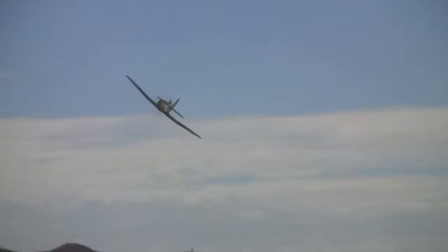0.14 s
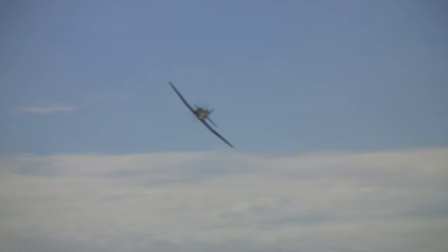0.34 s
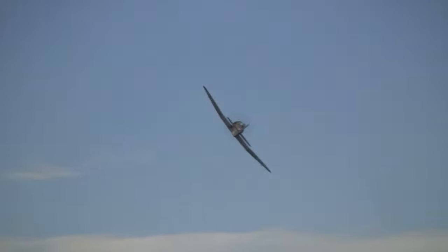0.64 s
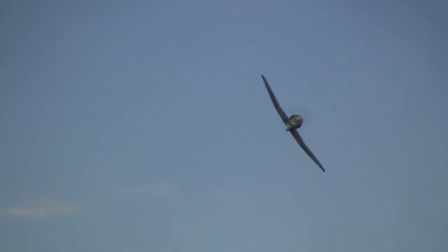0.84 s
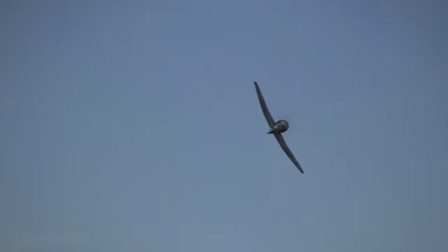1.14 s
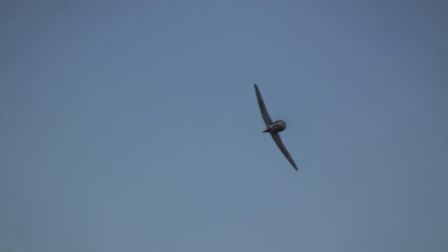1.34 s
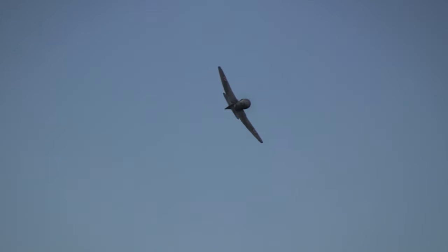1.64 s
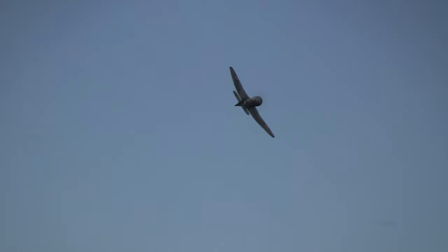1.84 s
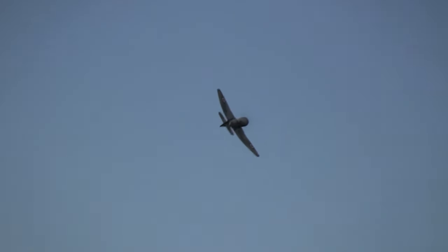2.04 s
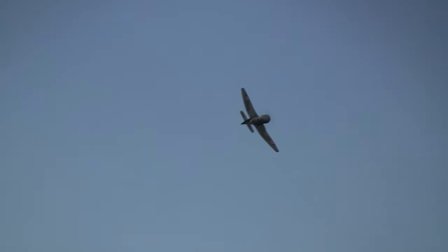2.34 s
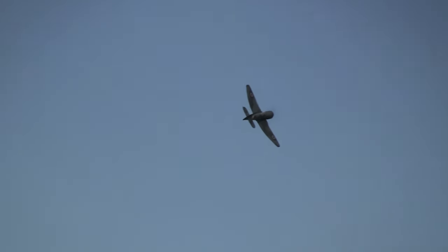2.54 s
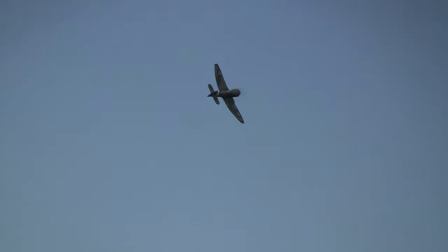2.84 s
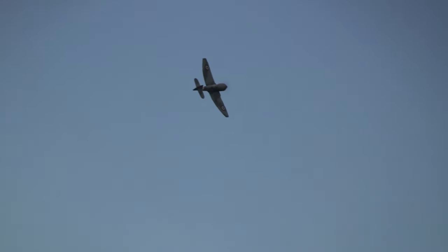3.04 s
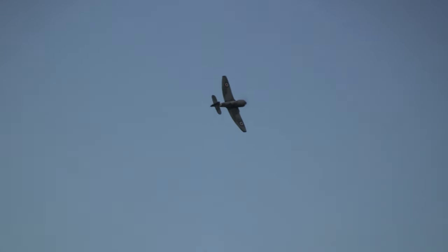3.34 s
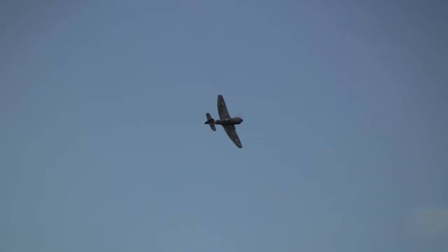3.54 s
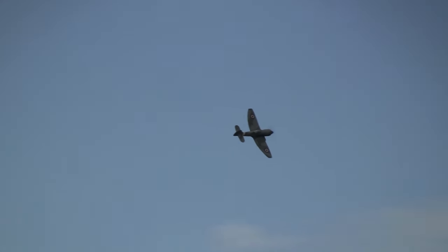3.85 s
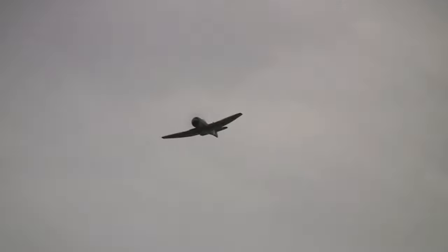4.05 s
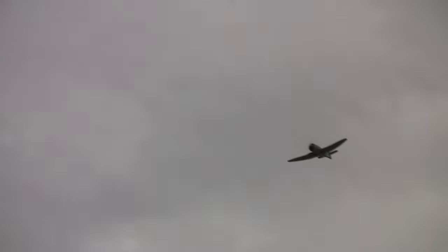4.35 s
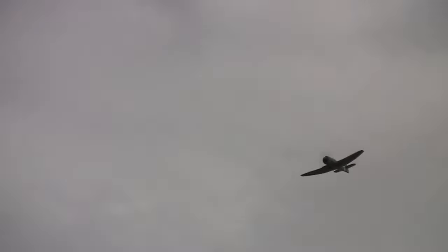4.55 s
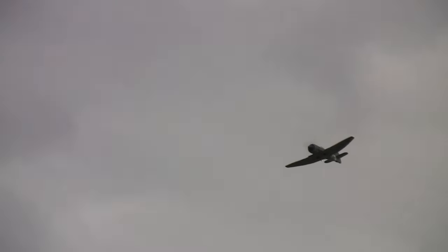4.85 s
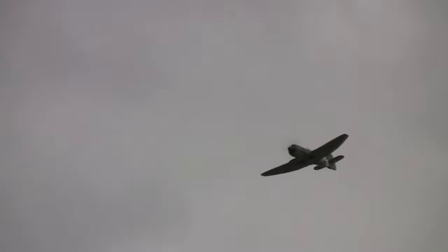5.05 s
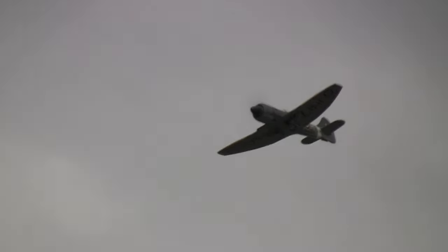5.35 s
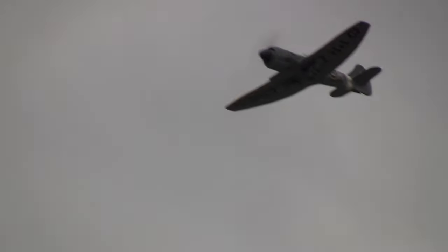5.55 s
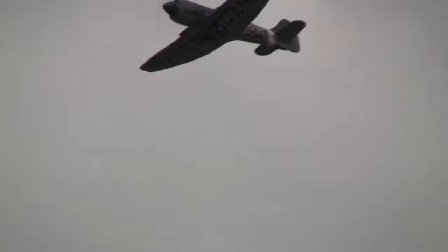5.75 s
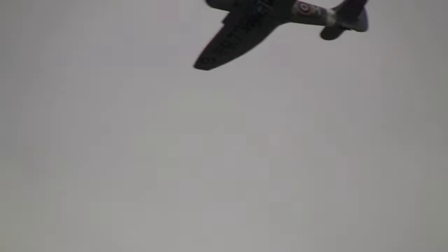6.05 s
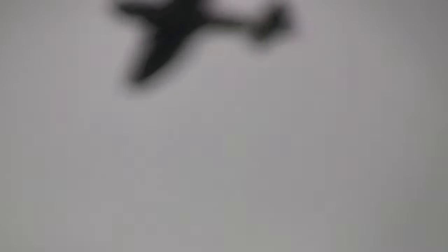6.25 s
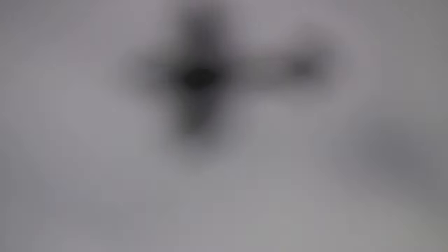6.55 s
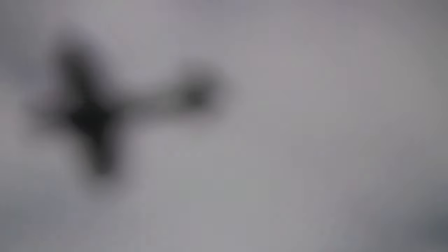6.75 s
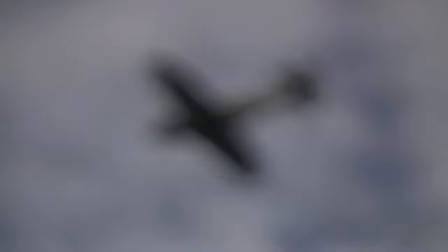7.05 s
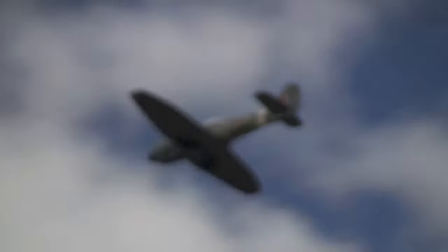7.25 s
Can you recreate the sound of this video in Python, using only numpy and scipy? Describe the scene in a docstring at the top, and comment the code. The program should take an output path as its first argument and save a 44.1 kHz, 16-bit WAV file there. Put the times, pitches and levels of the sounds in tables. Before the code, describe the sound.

A large model aircraft's engine drones outdoors, a low boom with a raspy bark above it, over a faint steady rumble. It softens during the first second, then holds its pitch, growing duller and more throbbing as the plane banks away. A small gust touches the microphone at 0.8 seconds, and a sharp close click with a dull bump comes at 1.6 seconds. At about 4 seconds everything dips briefly to silence. The engine returns, approaching and rising slightly in pitch, while low gusts buffet the microphone until about 6 seconds. It grows louder and brighter, with a hollow sweeping tone and a propeller hiss near 5.7 seconds. The plane passes overhead, loudest around 6.8 seconds, its pitch falling as the exhaust rasps and sizzles. Two faint, thin falling whistles sound near 6.7 and 7 seconds as it starts to move away.

```python
"""A model aircraft turns and flies overhead

A large model aircraft with a five-cylinder four-stroke engine banks away through a wide turn. After a
dip to silence it approaches and passes overhead, falling in pitch. Its exhaust makes a low boom and a
higher bark, and its propeller hisses. An echo off the ground sweeps a hollow colour through the sound,
and the air dulls it with distance. Gusts buffet the microphone, and something clicks close to it."""
import sys
import numpy as np
from scipy import signal
from scipy.fft import rfft, irfft, next_fast_len
from scipy.io import wavfile

SR = 44100
rng = np.random.default_rng(int(sys.argv[2]) if len(sys.argv) > 2 else 0)


def persist_wave(psi):
    """Save psi, clipped to +-1, as 16-bit WAV."""
    counts = np.round(np.clip(psi, -1, 1) * 32767).astype(np.int16)
    wavfile.write(sys.argv[1], SR, np.atleast_2d(counts).T)


N = 325899
T = np.arange(N) / SR


def undb(db):
    """Turn decibels into a factor to multiply by."""
    return 10 ** (np.asarray(db) / 20)


def curves(table):
    """Join the rows of a (time, values...) table with straight lines: one curve per value."""
    times, *columns = np.transpose(table)
    return [np.interp(T, times, column) for column in columns]


def unit(x):
    """Scale a signal to a typical size (rms) of 1."""
    return x / np.std(x)


def swell(middle_s, length_s):
    """A smooth, bell-shaped rise and fall."""
    return np.exp(-2 * ((T - middle_s) / length_s) ** 2)


def noise():
    """White noise: an even hiss."""
    return rng.standard_normal(N)


def colour(x, points):
    """Shape the lows and highs by (frequency [Hz], level [dB]) points; the result has size 1."""
    size = next_fast_len(N, real=True)
    hz = np.maximum(np.fft.rfftfreq(size, 1 / SR), 1)
    point_hz, point_db = np.transpose(points)
    gain = undb(np.interp(np.log(hz), np.log(point_hz), point_db))
    return unit(irfft(rfft(x, size) * gain, size)[:N])


def narrow_noise(hz, width_hz):
    """Noise gathered around one pitch, which may move."""
    lowpass = signal.butter(2, width_hz / 2, fs=SR, output="sos")
    slow = signal.sosfilt(lowpass, noise() + 1j * noise())
    return unit(np.real(slow * np.exp(2j * np.pi * np.cumsum(hz) / SR)))


def walk(per_s):
    """Wander smoothly to a new random value per_s times a second."""
    place = np.minimum(T * per_s, 1022)
    k = place.astype(int)
    values, step = rng.standard_normal(1024), place - k
    return values[k] + (values[k + 1] - values[k]) * step * step * (3 - 2 * step)


def background():
    """A steady, quiet rumble and hiss."""
    # colour of the rumble and hiss (frequency [Hz], level [dB])
    rumble_colour = [(25, -38), (45, -22), (62, -7), (82, 0), (110, -8), (200, -15), (500, -28),
                     (1500, -38), (4000, -46), (8000, -50), (15000, -53)]
    return undb(-47) * colour(noise(), rumble_colour)


def faint_tone(middle_s=1.34, length_s=.317, top_hz=343, sag_hz=22.4):
    """A soft, low tone whose pitch and loudness rise and fall once."""
    place = np.clip(2 * (T - middle_s) / length_s, -1, 1)
    hz = top_hz - sag_hz * place ** 2
    return undb(-41.5) * (1 - place ** 2) * np.sin(2 * np.pi * np.cumsum(hz) / SR)


def wind():
    """Each gust swells and dies as a low flutter on the microphone."""
    # gusts (time [s], length [s], level [dB])
    gusts = [(0.791, 0.06, -30), (4.167, 0.18, -26.5), (4.427, 0.12, -28), (4.624, 0.17, -40),
             (4.857, 0.19, -26.5), (5.207, 0.13, -31), (5.72, 0.29, -30.5)]
    # colour of the flutter (frequency [Hz], level [dB])
    gust_colour = [(25, -50), (60, -35), (130, -16), (190, -6), (245, 0), (290, -4), (340, -10), (420, -27),
                   (1000, -40), (4000, -54), (12000, -75)]
    strength = sum(undb(db) * swell(s, length) for s, length, db in gusts)
    return strength * colour(noise(), gust_colour)


def click(start_s=1.6285):
    """A small hard part snaps and rings for a few milliseconds."""
    # ringing tones (pitch [Hz], time to fade by 60 dB [s], starting level [dB])
    tones = [(2750, 0.0073, -24), (3350, 0.0087, -12), (4900, 0.007, -21), (5300, 0.0049, -44),
             (5950, .006, -30), (8100, .008, -23), (12000, 0.0014, -12)]
    age = np.clip(T - start_s, 0, .1)
    return sum(undb(db - 60 * age / fade_s) * np.sin(2 * np.pi * hz * age) for hz, fade_s, db in tones)


def knocks(size=16384):
    """Small ticks and dull bumps close by: fading bursts of noise, each around its own pitch."""
    # bursts (time [s], pitch [Hz], width [octaves], time to fade by 60 dB [s], level [dB])
    bursts = [(1.548, 9000, 0.25, 0.0073, -50), (1.628, 5100, 0.49, 0.0054, -9),
              (1.636, 130, 0.56, 0.11, -25), (1.645, 60, 0.44, 0.08, -29), (2.701, 2840, 0.29, 0.048, -47),
              (2.955, 7500, .4, .02, -56), (5.68, 62, 0.5, .14, -38)]
    out, age = np.zeros(N + size), np.arange(size) / SR
    freq = np.fft.rfftfreq(size, 1 / SR) + 1
    for s, hz, octaves, fade_s, db in bursts:
        band = np.exp(-(np.log2(freq / hz) / octaves) ** 2 / 2)
        burst = unit(irfft(rfft(rng.standard_normal(size)) * band))
        start = int(s * SR)
        out[start:start + size] += burst * (1 - np.exp(-hz * age)) * undb(db - 60 * age / fade_s)
    return out[:N]


def ground(x, lag_ms, reflect):
    """Add a duller echo off the ground; it strengthens some pitches and weakens those between."""
    dull = signal.sosfiltfilt(signal.butter(1, 9000, fs=SR, output="sos"), x)
    return x + reflect * np.interp(T - lag_ms / 1000, T, dull)


def air(x, loss_db):
    """Air soaks up treble: loss_db at 4 kHz, and more with frequency up to 7 kHz."""
    hz, times, spectra = signal.stft(x, SR, nperseg=512)
    cut_db = np.outer(np.minimum(hz, 7000) / 4000, np.interp(times, T, loss_db))
    return signal.istft(spectra * undb(-cut_db), SR, nperseg=512)[1][:N]


def whistles(fall_per_s=.13):
    """Two brief, thin whistles fall in pitch as the aircraft goes by."""
    # thin whistles (time [s], length [s], pitch [Hz], level [dB])
    notes = [(6.65, 0.18, 3890, -41), (7.035, 0.12, 2930, -38.5)]
    out = 0
    for s, length, hz, db in notes:
        note = narrow_noise(hz * (1 - fall_per_s * (T - s)), width_hz=32)
        out += undb(db) * swell(s, length) * note / np.sqrt(2)
    return out


def tip_hiss(rate, distance, ahead, cone_deg=46.7, spread_deg=7.6):
    """Propeller tips throw hiss forward in a cone, loudest as the cone sweeps over the listener."""
    # colour of the hiss (frequency [Hz], level [dB])
    tip_colour = [(800, -28), (1800, 6.5), (2600, 2.5), (4400, 0), (6000, -10), (8000, -30), (14000, -43)]
    off_cone = (np.degrees(np.arccos(ahead)) - cone_deg) / spread_deg
    blades = 2 * np.pi * 4 * np.cumsum(rate) / SR
    hiss = colour(noise() * (1 + .89 * np.cos(blades)), tip_colour)  # chopped once per blade
    return hiss * undb(-37 - off_cone ** 2) / distance


def sizzle(rate, distance, ahead):
    """A short spit of gas at each firing, louder in front; the air soon swallows it."""
    # colour of the spit (frequency [Hz], level [dB])
    spit_colour = [(2000, -25), (4400, -2), (5300, -3), (6200, 7.5), (7400, -10), (8300, -3), (10000, -14),
                   (11900, -9.5), (13400, -14), (14500, -24)]
    firing = 2 * np.pi * 5 * np.cumsum(rate) / SR
    spits = noise() * np.exp(.97 * np.cos(firing) + .33 * walk(60))
    return colour(spits, spit_colour) * undb(-51.5 + 5.5 * ahead) / distance ** 3


def throbbing_bands(rate):
    """Bands of noise near 2 kHz throb with the engine; a low hum near 500 Hz swells after the pass."""
    # bands (time [s], length [s], pitch [times the cycle rate], width [Hz], level [dB], throb [dB])
    bands = [(6.57, .3, 123, 330, -38.5, 4), (7.05, .5, 113, 360, -41, 5), (7.2, .42, 31, 70, -33.5, 1)]
    cycle = 2 * np.pi * (np.cumsum(rate) / SR - .86)
    throb = np.cos(cycle) + .35 * np.cos(2 * cycle) + .4 * np.cos(10 * cycle)
    out = 0
    for s, length, multiple, width_hz, db, throb_db in bands:
        band = unit(undb(throb_db * throb) * narrow_noise(multiple * rate, width_hz))
        out += undb(db) * swell(s, length) * band
    return out


def clatter(cycles, size=65536):
    """Moving parts rattle in a pattern that repeats every engine cycle and slowly changes."""
    multiples, out = np.arange(1, 400), 0
    strength = undb(-4 * (multiples % 2))  # tones in step with the shaft are stronger
    for _ in range(2):
        spectrum = strength * np.exp(2j * np.pi * rng.random(len(multiples)))
        pattern = irfft(np.r_[0, spectrum], size)
        drift = 1.458 * T + walk(.97) + 2 * np.pi * rng.random()
        out += np.cos(drift) * pattern[(cycles % 1 * size).astype(int) % size]
    return unit(out)


def engine_tones(cycles, table, side, scatter, afterbeat_cycles=.157):
    """Exhaust and propeller tones: in step they make beats, scattered they make a drone."""
    out = 0
    for multiple, *levels in table:
        smear = -np.pi * (multiple - 43) ** 2 / 180  # the pipes draw each beat out
        # the shift in timing that a second, half-strength beat gives this tone
        afterbeat = np.angle(1 + .5 * np.exp(-2j * np.pi * multiple * afterbeat_cycles))
        looseness = 1 + (max(multiple - 44, 0) / 9) ** 2  # high tones keep less in step
        phase = smear + afterbeat + np.minimum(scatter * looseness, np.pi) * rng.uniform(-.99, 1)
        gain = np.interp(side, [0, .5, 1], undb(levels))
        out += gain * np.cos(2 * np.pi * (multiple * cycles % 1) + phase)
    return np.sqrt(2) * out


def engine(rate, view, side, boom_tones, bark_tones, rasp_colour, boom_db, bark_db, burble_db,
           beats_db, clatter_db, gas_db, throb_db, lope_db, ring_on_db, flutter_db, uneven_db,
           scatter, pulsing, jitter):
    """Exhaust boom, bark and rasp. One cycle is two shaft turns and five firings, each a puff of gas.
    Rate is cycles a second. View (throb) and side (mix of tones) go from 0, nose-on, to 1, side-on."""
    # colour of the exhaust's uneven burble (frequency [Hz], level [dB])
    burble_colour = [(25, -48), (50, -42), (90, -5.5), (125, 1.5), (175, 7.5), (260, 4.5), (340, 0),
                     (450, -23.5), (800, -52)]
    cycles = np.cumsum(rate) / SR - .86 + jitter * walk(40)  # no two firings are timed alike
    shaft, firing = 2 * np.pi * 2 * cycles, 2 * np.pi * 5 * cycles
    puffs = np.exp(pulsing * (.28 * np.cos(firing) + np.cos(2 * firing)))
    boom = engine_tones(cycles, boom_tones, side, scatter=np.pi) * undb(.5 * walk(6.7))
    boom += undb(burble_db) * colour(noise(), burble_colour)
    rasp = undb(clatter_db) * colour(puffs * clatter(cycles), rasp_colour)
    rasp += undb(gas_db) * colour(puffs * noise(), rasp_colour)
    # from the side, the bark gathers into one beat per shaft turn, every other beat stronger
    throb = throb_db * (.15 + .85 * view) * (np.cos(shaft) + 1.2 * np.cos(shaft / 2 - .5))
    throb += ring_on_db * np.sin(shaft)  # the pipes ring on after the beat, then fall quiet
    beats = engine_tones(cycles, bark_tones, side, scatter) * undb(throb)
    lope = lope_db * view * np.cos(shaft / 2)  # unequal cylinders swell the rasp once per cycle
    bark = undb(beats_db) * beats + rasp * undb(throb / 2 + lope)
    bark *= undb(uneven_db * walk(45))  # no two beats are equally strong
    bark *= undb(bark_db + flutter_db * walk(14))  # swirling air makes the higher sounds flutter
    return boom * undb(boom_db) + bark


def wide_turn():
    """The aircraft banks from nose-on to side-on and grows duller as it draws away."""
    # engine speed (time [s], cycle rate [Hz])
    speed = [(0, 17.73), (.7, 17.51), (2, 17.52), (2.4, 17.41), (2.85, 17.52), (3.1, 17.45), (4, 17.51)]
    # lag of the ground echo, growing as the aircraft climbs (time [s], lag [ms])
    echo_lag = [(0, .97), (.2, 1.01), (.7, 1.15), (1.1, 1.235), (1.5, 1.295), (2.7, 1.375), (3.55, 1.49),
                (3.95, 1.457)]
    # exhaust loudness (time [s], boom [dB], bark [dB])
    loudness = [(0, -28, -29.5), (.55, -34.5, -36), (.9, -35.5, -38), (1.25, -36.5, -38), (2.1, -35, -36.5),
                (3.2, -33, -37.5), (3.9, -31.5, -37.5)]
    # low tones (pitch [times the cycle rate], nose-on [dB], half turned [dB], side-on [dB])
    boom_tones = [(5, -27, -25, -21), (8, -11, -23, -14), (9, -24.5, -25, -31), (10, 0, -.5, 0),
                  (12, -16.5, -13.5, -14.5), (14, -11.5, -4, -1), (16, -18, -20, -31.5),
                  (18, -23, -30, -23.5), (20, -9, -15, -24), (22, -24, -24, -34), (24, -20, -13, -20)]
    # higher tones (pitch [times the cycle rate], nose-on [dB], half turned [dB], side-on [dB])
    bark_tones = [(26, -18, -14, -16.5), (30, -14.5, -3.5, -7.5), (32, -8.5, -15, -10), (34, -2, -5, -9.5),
                  (36, -29, -24, -16.5), (38, -9.5, 0.5, -10), (40, -20, -2.5, -7.5), (44, -21, -14.5, -12),
                  (46, -18, -14, -9.5), (48, -17, -16.5, -6), (50, -18, -17.5, -21.5), (52, -15, -28, -19),
                  (54, -9, -19, -22), (55, -14, -30, -34), (56, -9, -15, -24), (58, -20, -28, -27),
                  (60, -14, -26, -29), (64, -16, -20, -24), (66, -24, -15, -21), (70, -37, -15, -17),
                  (72, -21, -30, -15), (74, -37, -21, -14), (76, -28, -24, -16), (80, -38, -27, -15),
                  (82, -33, -17.5, -11.5), (84, -24, -28, -15.5), (98, -30, -18.5, -31),
                  (114, -34, -21, -17)]
    # rasp of gas, valves and blades (frequency [Hz], level [dB])
    rasp_colour = [(200, -52), (350, -4), (500, 0), (700, 1.5), (1000, -5.5), (1500, -4), (2500, -9.5),
                   (4000, -13.5), (6000, -20), (9000, -28), (15000, -46)]
    # the tones fall into step, so beats emerge from a drone (time [s], scatter [radians])
    out_of_step = [(.4, 3), (1, 1), (1.6, .3)]
    # how much the pipes ring on after each beat (time [s], depth [dB])
    ring_on = [(.5, 0), (1.3, 2), (2, 3.5), (2.9, 2.8), (3.6, 1.2)]
    (rate,), (lag_ms,), (boom_db, bark_db) = curves(speed), curves(echo_lag), curves(loudness)
    (scatter,), (ring_on_db,) = curves(out_of_step), curves(ring_on)
    turning_s = np.maximum(T - .91, 0)
    view = 1 - np.exp(-turning_s)
    side = np.clip((T - .66) / 2.88, 0, 1)  # banking sweeps the exhaust's beams over the listener
    sound = engine(rate, view, side, boom_tones, bark_tones, rasp_colour, boom_db, bark_db,
                   burble_db=-9.5, beats_db=-1, clatter_db=-7.5, gas_db=-2.5,
                   throb_db=.7, lope_db=.6, ring_on_db=ring_on_db, flutter_db=.36, uneven_db=.8,
                   scatter=scatter, pulsing=.15, jitter=.00045)
    loss_db = 4.5 + 10.5 * view + 2 * turning_s + .31 * walk(3.3)
    return air(ground(sound, lag_ms, reflect=.51), loss_db)


def overhead_pass(closest_s=6.804, crossing_s=1.1715, share_of_sound_speed=.09):
    """A straight fly-by: distance and angle set the pitch, level, dullness and ground echo."""
    # engine speed on board, rising in the dive, then easing (time [s], cycle rate [Hz])
    speed = [(4.55, 15.99), (5, 16.34), (5.26, 16.83), (6.08, 16.96), (6.28, 16.6), (6.62, 16.35),
             (7.31, 16.16)]
    # low tones (pitch [times the cycle rate], nose-on [dB], half turned [dB], side-on [dB])
    boom_tones = [(5, -18.5, -18.0, -21.5), (8, -16.0, -8.0, -11.5), (9, -10.0, -13.0, -14.5),
                  (10, 1.0, 0.5, -1.5), (11, -6.5, -6.5, -8.0), (12, -18.5, -13.0, -26.5),
                  (13, -8.0, -12.0, -17.0), (14, -5.5, -2.5, -3.0), (15, -5.0, -13.0, -11.0),
                  (16, -21.5, -9.0, -2.0), (19, -14.5, -24.0, -22.0), (20, -14.5, -18.0, -14.0),
                  (22, -30.5, -17.0, -30.5), (24, -21.0, -29.5, -12.0)]
    # higher tones (pitch [times the cycle rate], nose-on [dB], half turned [dB], side-on [dB])
    bark_tones = [(25, -18.0, -20.0, -29.0), (26, -19.5, -24.0, -15.5), (30, -16.5, -22.5, -18.0),
                  (32, -18.5, -23.0, -24.5), (34, -21.5, -23.0, -14.0), (40, -19.5, -20.5, -13.0),
                  (44, -12.5, -17.0, -13.5), (46, -22.5, -25.5, -19.5), (48, -17.5, -30.0, -17.5),
                  (50, -14.5, -31.0, -19.5), (52, -20.5, -29.5, -16.0), (55, -31.0, -29.5, -20.0),
                  (57, -31.0, -33.5, -18.0), (58, -16.5, -21.5, -17.5), (59, -20.0, -25.5, -18.0),
                  (60, -21.0, -19.5, -27.0), (62, -30.0, -25.5, -17.5), (64, -30.5, -23.5, -11.5),
                  (65, -17.5, -24.0, -16.0), (66, -19.0, -28.0, -14.5), (70, -25.5, -19.0, -15.5),
                  (71, -23.0, -28.5, -16.5), (75, -31.5, -29.5, -14.0), (76, -31.5, -29.0, -12.5),
                  (77, -32.0, -29.5, -17.5), (81, -27.0, -33.5, -19.0), (86, -32.5, -34.5, -17.0),
                  (87, -32.5, -36.0, -20.5)]
    # rasp of gas, valves and blades (frequency [Hz], level [dB])
    rasp_colour = [(200, -36), (400, 0), (600, -0.5), (900, -1), (1200, -0.5), (1600, -5.5), (2300, -7.5),
                   (4000, -15), (6200, -23), (7500, -26), (8300, -28.5), (10000, -33.5), (13400, -41.5),
                   (14500, -53)]
    along = (T - closest_s) / crossing_s
    distance = np.hypot(1, along)  # 1 at the closest point
    ahead = -along / distance  # 1 coming straight on, 0 overhead, -1 going away
    rate = curves(speed)[0] / (1 - share_of_sound_speed * ahead)  # the Doppler effect
    view, side = (1 - ahead ** 2) ** 2, np.clip(2 / distance - 1, 0, 1)
    distance_db, nose = -20 * np.log10(distance), np.maximum(ahead, 0)
    # the boom weakens toward the nose; the bark is strongest half-way between nose and side
    boom_db = -24 + distance_db - 2.5 * nose ** 2
    bark_db = -30.5 + distance_db + 2.5 * np.sin(2 * np.arccos(nose)) ** 2
    sound = engine(rate, view, side, boom_tones, bark_tones, rasp_colour, boom_db, bark_db,
                   burble_db=-4 - view, beats_db=1.3, clatter_db=-3, gas_db=-2.4,
                   throb_db=.6, lope_db=1.1, ring_on_db=0, flutter_db=.51, uneven_db=.6,
                   scatter=1.3, pulsing=.16, jitter=.00065)
    lag_ms, reflect = 1.076 + 5.648 / distance, .85 - .3 * view  # overhead: a later, weaker echo
    loss_db = -.5 + 3.5 * (distance - 1) + .31 * walk(3.3)
    sound = air(ground(sound, lag_ms, reflect), loss_db)
    sound += throbbing_bands(rate) + sizzle(rate, distance, ahead)
    return sound + ground(tip_hiss(rate, distance, ahead), lag_ms, reflect)


def scene():
    """Everything fades out after the turn and fades back in for the overhead pass."""
    leave_s, silent_s, arrive_s = 3.95, 4.027, 4.144
    fade = np.interp(T, [leave_s, silent_s, arrive_s], [1, 0, 1])
    flight = np.where(T < silent_s, wide_turn(), overhead_pass()) + whistles()
    surroundings = background() + faint_tone() + wind() + click() + knocks()
    return (fade * (flight + surroundings))[None]


def record(dry):
    """Cut away the highest treble, above 15.8 kHz."""
    return signal.sosfilt(signal.ellip(8, .2, 70, 15800, fs=SR, output="sos"), dry)


dry = scene()
out = record(dry)
persist_wave(out)
```